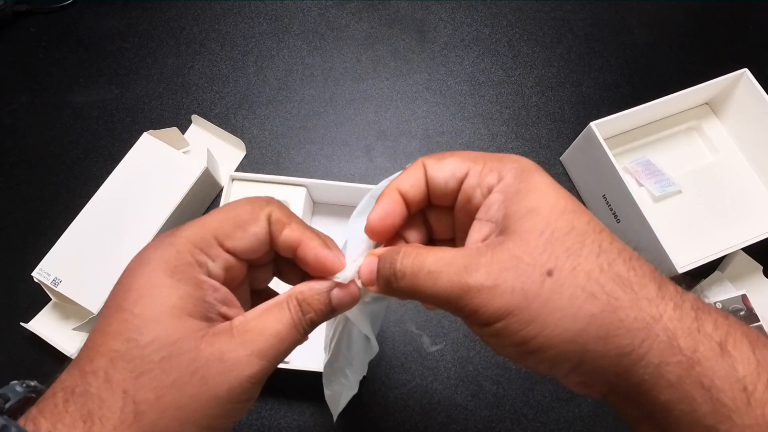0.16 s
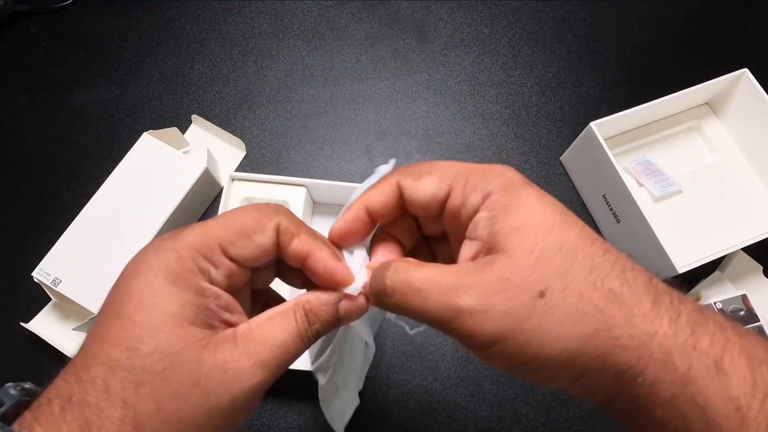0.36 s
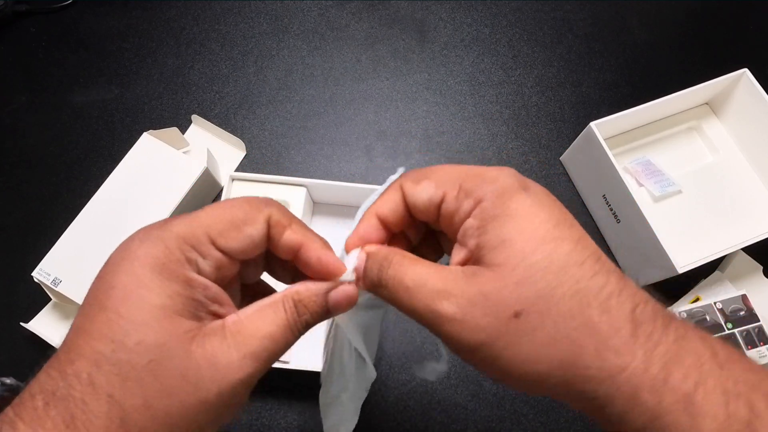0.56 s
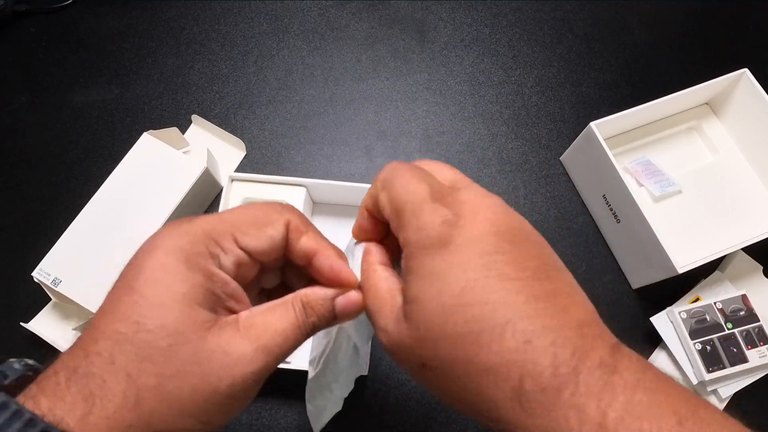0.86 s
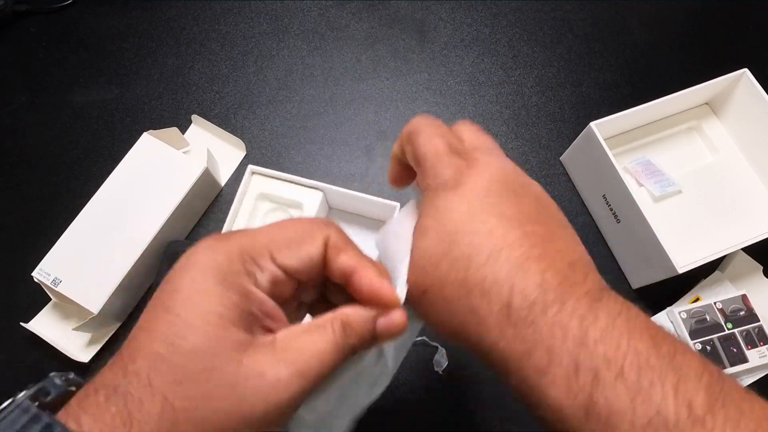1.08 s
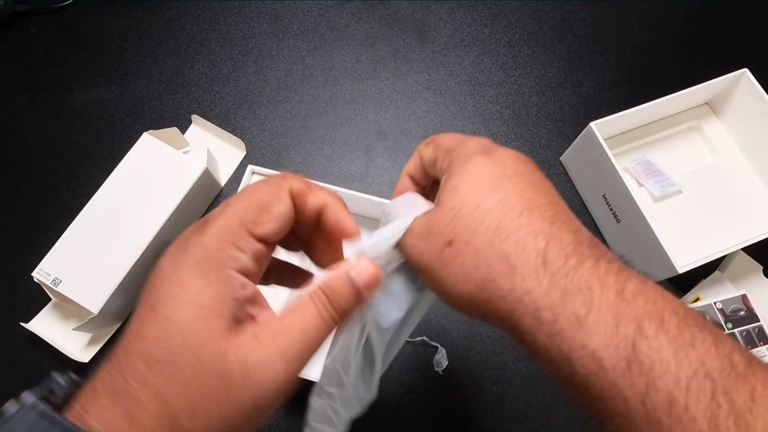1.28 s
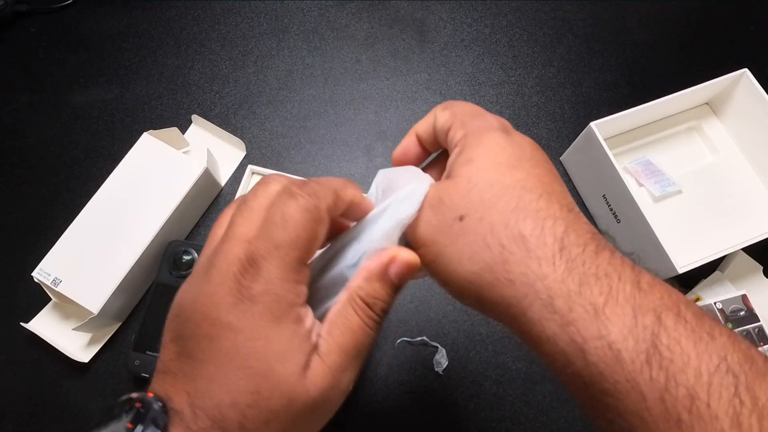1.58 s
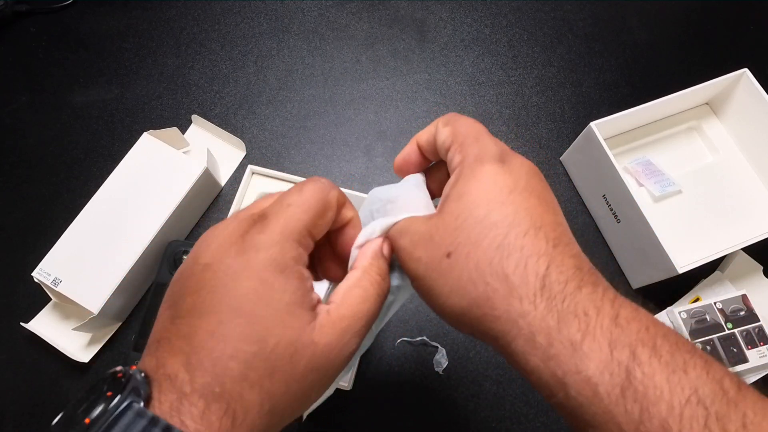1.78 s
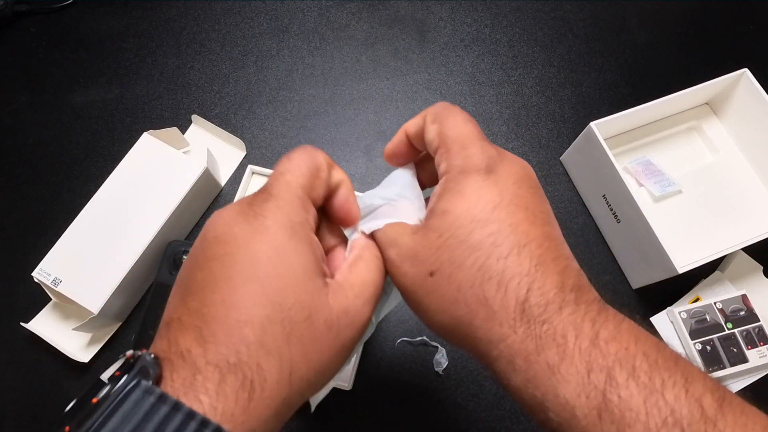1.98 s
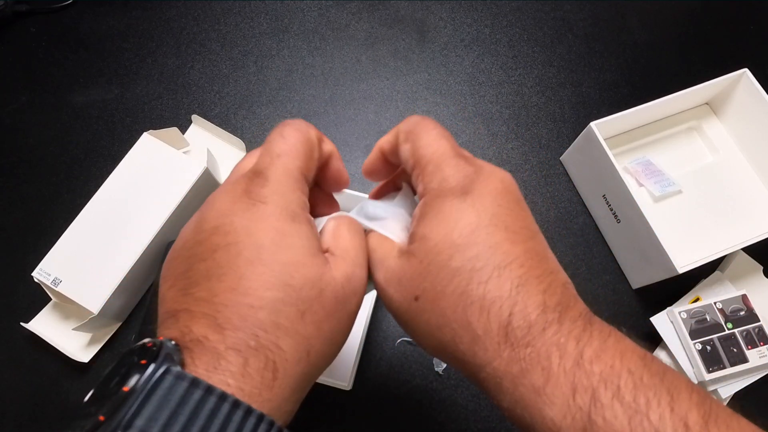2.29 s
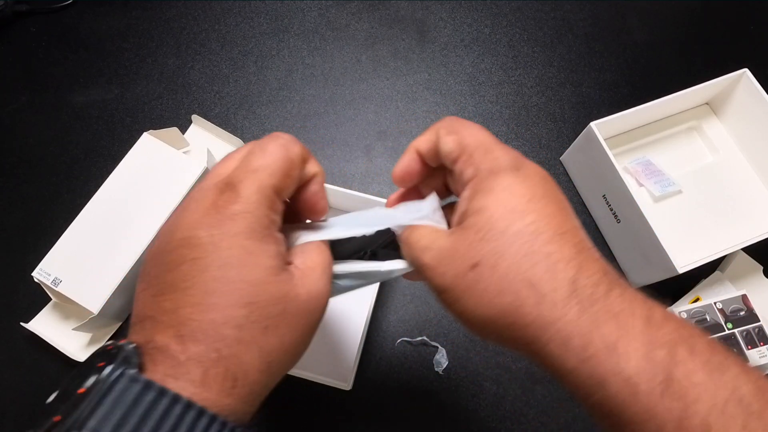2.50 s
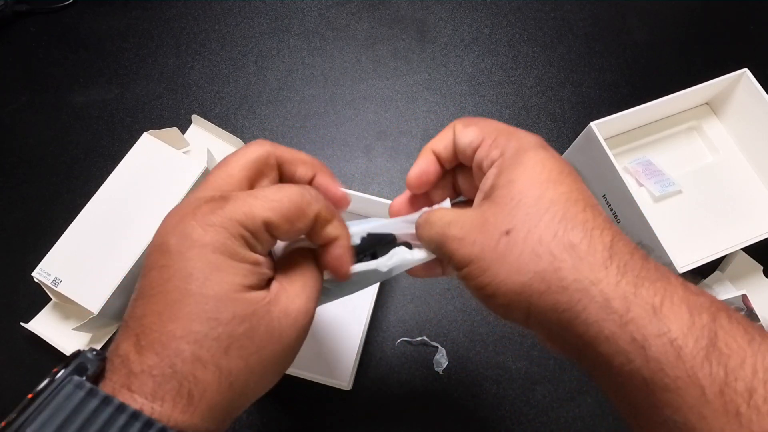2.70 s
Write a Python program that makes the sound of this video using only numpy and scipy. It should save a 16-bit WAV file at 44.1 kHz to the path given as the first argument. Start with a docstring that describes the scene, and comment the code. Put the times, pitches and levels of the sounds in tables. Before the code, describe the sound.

Plastic film rustling and snapping in the fingers, with short rips and soft pops, indoors

```python
"""A thin plastic bag over a desk in a small quiet room, held slightly right of a pair of microphones.
Ventilation rumble, a low drone and a wavering hum lie below throughout. From the start, film slides on
film in a rustle of tiny buckles and creases snap; then a fingertip slips on stretched film and plucks it,
and wider folds ring dully. Later, short rips run as trains of tiny breaks, the sheet pops and thumps
the air in the bag as it goes taut, and friction squeaks once; rustle, snaps and rips go on after that."""
import sys
import numpy as np
from scipy import signal
from scipy.fft import rfft, irfft, next_fast_len
from scipy.io import wavfile

SR = 44100
rng = np.random.default_rng(int(sys.argv[2]) if len(sys.argv) > 2 else 0)


def waveform_to_disk(signal):
    """Save audio, clipped to [-1, 1], as 16-bit WAV at the path in sys.argv[1]."""
    frames = np.transpose(np.atleast_2d(signal))
    scaled = np.clip(frames, -1, 1) * 32767
    samples = np.round(scaled).astype(np.int16)
    wavfile.write(sys.argv[1], SR, samples)


N = 125685
TIME = np.arange(N) / SR  # seconds

# ventilation colour: (frequency [Hz], relative density [dB per Hz])
AIR_SPECTRUM = [(18, -5.5), (29, -5), (40, 1), (52, -22.5), (70, -11.5), (90, -23.5), (115, -16),
                (170, -23), (370, -19.5), (650, -37), (2000, -42), (16000, -51)]
AIR_DB, AIR_SIDE_DB = -54, -7  # rms level; left-right difference noise relative to the common noise
HUM_HZ, HUM_DB = 118.5, -69.5  # median rms level
DRONE_HZ, DRONE_DB = 29.3, -55  # median rms level

# rustle before the layer trims: (time [s], treble level [dB], middle level [dB])
RUSTLE = [(0, -51, -51), (0.11, -50, -51), (0.186, -51.5, -55), (0.21, -61, -54.5), (0.266, -61, -57.5),
          (0.307, -42, -49), (0.339, -64, -51), (0.385, -61, -55), (0.439, -44, -46.5), (0.468, -50, -54.5),
          (0.538, -52.5, -52), (0.56, -41.5, -46), (0.596, -40.5, -42), (0.615, -62, -52.5),
          (0.692, -59.5, -50), (0.735, -39, -56.5), (0.759, -40, -49.5), (0.81, -52.5, -54),
          (0.884, -63, -60), (0.936, -48.5, -51), (0.977, -34.5, -36), (1.004, -42, -48), (1.1, -41.0, -46),
          (1.126, -47, -51), (1.182, -40.5, -43.5), (1.195, -28.5, -30), (1.238, -32, -36.5),
          (1.266, -38.5, -40), (1.341, -51.5, -47.5), (1.381, -58.5, -46), (1.419, -39, -41),
          (1.48, -36.5, -38.5), (1.521, -42.5, -50.5), (1.572, -52.5, -48), (1.631, -47.5, -50.5),
          (1.695, -40, -40), (1.75, -42, -48.5), (1.846, -45.5, -47), (1.884, -38.5, -40),
          (1.934, -53, -46.5), (1.97, -44, -49), (2.03, -40, -46), (2.06, -49, -47.5), (2.113, -41.5, -46),
          (2.151, -49.5, -51.5), (2.194, -41.5, -39), (2.219, -51.5, -52.5), (2.254, -51.5, -51),
          (2.3, -43.5, -45.5), (2.41, -44, -44), (2.445, -45.5, -44.5), (2.499, -44, -42.5),
          (2.542, -41, -41.5), (2.559, -33, -35), (2.591, -34, -34), (2.615, -39, -38.5), (2.671, -36, -39),
          (2.735, -37.5, -35.5), (2.757, -47.5, -47.5), (2.85, -43.5, -49)]
# low body of the sheet relative to its middle, before the trims: (time [s], level [dB])
FULLNESS = [(0,-10.5),(.3,-2.5),(.55,2),(.75,-3.5),(1.15,-6),(1.2,4),(1.35,1),(1.55,-4),(1.9,2),(2.0,-2.2),(2.3,-1),(2.85,2)]
# colour of the bright sliding: (frequency [Hz], relative density [dB per Hz])
TREBLE_SPECTRUM = [(900, -69), (1800, -4.5), (2500, -3.5), (3600, -2), (5500, 0.5), (7500, 0.5),
                   (10000, -3.5), (12500, -3.5), (14000, -10.5), (16000, -17)]
# colour of the duller flexing: (frequency [Hz], relative density [dB per Hz])
MIDDLE_SPECTRUM = [(500,-37),(800,-9),(1100,1),(1600,2),(2200,3.5),(3200,1),(6000,-15.5)]
# colour of the low body of the sheet: (frequency [Hz], relative density [dB per Hz])
BODY_SPECTRUM = [(90,-5.5),(170,-11),(270,-6.5),(380,4),(560,1),(760,-5),(1100,-2.5),(2000,-15)]
TREBLE_TRIM_DB, MIDDLE_TRIM_DB, BODY_TRIM_DB = -1, -4, -10.5
TREBLE_GRAIN, MIDDLE_GRAIN = 0.47, 0.74  # share of power in separate buckles
BUCKLE_SPREAD_DB = 3
# the buckle rate holds at this treble level and climbs with it (dB of rate per dB of treble)
BUCKLES_PER_S, BUCKLES_AT_DB, BUCKLES_FOLLOW = 2200, -44.5, 1.3

FINE, SMALL, BROAD, WIDE = 8400, 6360, 4770, 3460  # crease sizes, by the centre of their click (Hz)
# single creases snapping, before the trim: (time [s], energy [dB], click centre [Hz])
SNAPS = [(.023,-11,SMALL),(.057,-20,SMALL),(0.064,-17.5,BROAD),(0.0855,-22,BROAD),(0.097,-17,SMALL),(0.118,-20,SMALL),(.1617,-24,FINE),(0.1655,-28,SMALL),(.18,-26,BROAD),
         (.2164,-19,FINE),(0.227,-27,FINE),(0.2334,-24.5,SMALL),(.2705,-29,SMALL),(0.3034,-10.5,SMALL),(.3188,-16.5,SMALL),(0.327,-15,FINE),(0.349,-11.5,FINE),(.366,-25,SMALL),
         (0.393,-23,SMALL),(.4052,-18.5,FINE),(.427,-20,SMALL),(0.4467,-17,SMALL),(0.481,-17,SMALL),(0.5423,-17.5,FINE),
         (0.645,-18,FINE),(0.647,-19.5,WIDE),(.667,-21,BROAD),(.682,-18,WIDE),(0.694,-16.5,FINE),(.712,-10,BROAD),(0.7516,-5.5,SMALL),(0.775,-23,BROAD),
         (0.816,-23,SMALL),(.83,-18,SMALL),(0.8412,-20,FINE),(0.8534,-4,BROAD),(.904,-18,BROAD),(.915,-12.5,BROAD),(1.0683,-11.5,BROAD),(1.145,-16,FINE),
         (1.327,-20,BROAD),(1.3571,-12,BROAD),(1.394,-24,BROAD),(1.404,-16,SMALL),(1.421,-5,BROAD),(1.4679,-12,BROAD),(1.482,-11,SMALL),(1.5693,-22,SMALL),(1.593,-13,SMALL),(1.6125,-14,SMALL),
         (1.834,-12.5,SMALL),(1.8784,-13.5,BROAD),(1.9165,-16,BROAD),(1.948,-13.5,SMALL),(1.9865,-18,SMALL),(2.0745,-15.5,SMALL),(2.0822,-25,BROAD),
         (2.162,-24,BROAD),(2.201,-16,WIDE),(2.263,-14,SMALL),(2.268,-13.5,BROAD),(2.305,-12,FINE),(2.346,-11,BROAD),(2.42,-7,WIDE),(2.433,-11.5,WIDE),(2.452,-16,BROAD),
         (2.556,-15,BROAD),(2.587,-19,BROAD),(2.594,-7,WIDE),(2.6275,-22,BROAD),(2.6416,-7.5,FINE),(2.6668,-5.5,BROAD)]
SNAP_TRIM_DB, SNAP_WIDTH = -3.5, 0.4  # width as a share of the centre frequency
SHIVER_DB, SHIVER_T60_S = 6.5, 0.025  # relative to the click, at the treble level BUCKLES_AT_DB
SHIVER_FOLLOWS = 0.4  # dB more shiver per dB of rustle: busy film snaps in clusters

# fingertip slips, before softening: (time [s], level [dB], slack low mode relative to it [dB])
SLIPS = [(.4595,-43,-11),(.469,-38,-12),(0.4782,-45,0),(.4802,-40.5,-6),(0.485,-42,-1),(0.488,-45,-8),(.4915,-41,1.5),(.494,-33.5,-14),(2.2817,-33,-12)]
# notes of the stretched film: (frequency [Hz], relative level [dB], t60 [s])
SLIP_MODES = [(1080, 0, .013), (1370, 1, .014)]
SLIP_LOW_HZ, SLIP_LOW_T60_S, SLIP_SOFT_HZ = 537, 0.014, 1900

# wider folds buckling: (time [s], level [dB], centre [Hz])
FOLDS = [(0.913,-39,2290),(.978,-34,2010),(1.099,-38,1850),(1.192,-26.5,1950),(2.201,-36,2240),(2.338,-36,1260),(2.3447,-33.5,2190),(2.627,-37,1940),(2.666,-32,2090)]
FOLD_ATTACK_S, FOLD_T60_S, FOLD_WIDTH_HZ = 0.00029, 0.042, 320
FOLD_TONE_DB = -10  # peak of the clean ring relative to the rms of the noisy one

# short rips, before spreading and layering: (time [s], length [s], level [dB], centre [Hz])
RIPS = [(1.191,.016,-29,5040),(2.526,.009,-31.5,4970),(2.57,.026,-33.5,3560),(2.677,.009,-39,3300),(2.716,.022,-38,2840)]
RIP_BREAKS_PER_S, RIP_BREAK_T60_S = 420, 0.0027
RIP_JITTER, RIP_WIDTH = .3, 0.87  # shares of the mean gap and of the centre frequency

# slack film flapping taut, before filtering: (time [s], level [dB], thump relative to it [dB])
FLAPS = [(1.192,-30,-3.5),(1.4705,-37.5,-9),(2.262,-41,-10),(2.4195,-29,-4),(2.667,-35.5,-6),(2.679,-33,-5)]
FLAP_T60_S, FLAP_LOW_HZ, FLAP_HIGH_HZ, FLAP_POP_DB = 0.022, 190, 2000, 18.5
THUMP_HZ, THUMP_T60_S = 310, .02  # the pocket of air in the bag

SQUEAK_S, SQUEAK_WIDTH_S, SQUEAK_HZ, SQUEAK_BAND_HZ, SQUEAK_DB = 1.403, .011, 6700, 750, -36

# desk and boxes, paths about 0.9, 1 and 3.2 m longer than the direct one: (delay [s], level [dB])
REFLECTIONS = [(.0025, -38), (.003, -28), (.0093, -49)]
ROOM_T60_S, ROOM_DB = 0.14, -18.5
# likeness of the two microphones: (frequency [Hz], left-right correlation [0 to 1])
LIKENESS = [(100, 0.77), (400, 1), (1000, 0.92), (2000, 0.84), (4000, 0.73), (8000, 0.095), (15000, 0.73)]
# left microphone relative to the right: (frequency [Hz], level [dB])
BALANCE = [(200, -0.5), (1000, -0.8), (2500, -2), (5000, -4), (9000, -3.5), (13000, -6.5)]
LEFT_LAG_S = .000028
CUTOFF_HZ = 16100


def from_db(db):
    """Decibels to gain."""
    return 10 ** (np.asarray(db) / 20)


def rms_one(x):
    """Scale to unit rms."""
    return x / np.sqrt(np.mean(x ** 2) + 1e-20)


def at_hz(points, hz):
    """Read a table on a log-frequency axis."""
    f, v = np.transpose(points)
    return np.interp(np.log(hz + 1), np.log(f), v)


def shaped(x, gain):
    """Filter by a smooth gain, given as a function of frequency."""
    size = next_fast_len(N + 8192)  # spare length keeps the end from wrapping to the start
    return irfft(rfft(x, size) * gain(np.fft.rfftfreq(size, 1 / SR)), size)[..., :N]


def drift(rate_hz):
    """Slow random wandering of unit rms: noise that falls away above the given rate."""
    return rms_one(shaped(rng.standard_normal(N), lambda f: 1 / (1 + (f / rate_hz) ** 2)))


def resonance(x, hz, width_hz):
    """Two-pole band-pass: a damped mode driven by x."""
    r = np.exp(-np.pi * width_hz / SR)
    return signal.lfilter([1, 0, -1], [1, -2 * r * np.cos(2 * np.pi * hz / SR), r * r], x + 1e-18)


def add(out, s, sound):
    """Mix a sound in at a time in seconds."""
    i = max(0, int(s * SR))
    out[..., i:i + sound.shape[-1]] += sound[..., :N - i]


def spread(pair):
    """Two unrelated signals become left and right, as alike as LIKENESS says at each frequency."""
    alike = lambda f: np.clip(at_hz(LIKENESS, f), 0, 1)
    common = shaped(pair[0], lambda f: np.sqrt(1 + alike(f)))
    difference = shaped(pair[1], lambda f: np.sqrt(1 - alike(f)))
    return common + difference * [[1], [-1]]


def background():
    """Ventilation rumble as coloured noise, with a hum and a low drone that waver in level and phase."""
    common = rng.standard_normal(N)
    side = from_db(AIR_SIDE_DB) * rng.standard_normal(N) * np.array([[1], [-1]])
    air = rms_one(shaped(common + side, lambda f: from_db(at_hz(AIR_SPECTRUM, f))))
    hum = from_db(HUM_DB + 3 * drift(6)) * np.sin(2 * np.pi * HUM_HZ * TIME + .7 * drift(9))
    drone = from_db(DRONE_DB + 0.6 * drift(5.5)) * np.sin(2 * np.pi * DRONE_HZ * TIME + drift(6.0))
    return from_db(AIR_DB) * air + np.sqrt(2) * (hum + drone)  # root two: sine peak to rms


def film(spectrum, grain, rate, patchy_db):
    """Tiny buckles of random size over sliding friction, each band patchy on its own; rms 1."""
    born = rng.random(N) < rate / SR
    size_db = BUCKLE_SPREAD_DB * np.minimum(rng.exponential(1, N), 4)
    sizes = born * from_db(size_db) / np.sqrt(rate)
    grain, out = np.clip(grain, 0, 1), 0
    edges = np.geomspace(80, 17000, 13)
    for band in zip(edges, edges[1:]):
        buckles = rms_one(sizes * rng.standard_normal((2, N)))
        friction = rng.standard_normal((2, N))
        drive = np.sqrt(grain) * buckles + np.sqrt(1 - grain) * friction
        band_pass = signal.butter(2, band, "band", fs=SR, output="sos")
        out = out + signal.sosfilt(band_pass, drive) * from_db(patchy_db * drift(23))
    return rms_one(shaped(spread(out), lambda f: from_db(at_hz(spectrum, f))))


def rustle(clump_db=1.5):
    """Bright sliding, duller flexing and a low body: sparse ticks when gentle, a dense rush when pulled hard."""
    s, *levels = np.transpose(RUSTLE)
    treble, middle = [np.interp(TIME, s, level) for level in levels]
    body = middle + np.interp(TIME, *np.transpose(FULLNESS))
    rate = BUCKLES_PER_S * from_db(BUCKLES_FOLLOW * (treble - BUCKLES_AT_DB))
    rate = np.minimum(rate, SR / 2)
    bright = from_db(treble + TREBLE_TRIM_DB) * film(TREBLE_SPECTRUM, TREBLE_GRAIN, rate, patchy_db=2.38)
    dull = from_db(middle + MIDDLE_TRIM_DB) * film(MIDDLE_SPECTRUM, MIDDLE_GRAIN, rate, patchy_db=2.9)
    low = from_db(body + BODY_TRIM_DB) * film(BODY_SPECTRUM, MIDDLE_GRAIN, rate, patchy_db=2.5)
    return from_db(clump_db * drift(50)) * (bright + dull + low)


def snaps():
    """A crease flips with a click of two or three cycles, and the film around it shivers."""
    out, t = np.zeros((2, N)), TIME[:SR // 30]
    times, treble, _ = np.transpose(RUSTLE)
    for s, db, hz in SNAPS:
        width_hz = SNAP_WIDTH * hz
        click = resonance(resonance(1.0 * (t == 0), hz, width_hz), hz, width_hz)
        fading = rng.standard_normal((2, len(t))) * from_db(-60 * t / SHIVER_T60_S)
        shiver = resonance(fading, hz, 0.84 * hz)
        busy_db = np.interp(s, times, treble) - BUCKLES_AT_DB
        share = from_db(SHIVER_DB + SHIVER_FOLLOWS * busy_db)
        snap = rms_one(rms_one(click) + share * rms_one(shiver)) / np.sqrt(len(t))  # unit energy
        add(out, s, from_db(db + SNAP_TRIM_DB) * snap)
    return out


def slips():
    """Each slip of a soft fingertip plucks the stretched film; slack film adds a lower note."""
    out, t = np.zeros(N), TIME[:SR // 30]
    mode = lambda hz, db, t60: from_db(db - 60 * t / t60) * np.sin(2 * np.pi * hz * t)
    pluck = sum(mode(*row) for row in SLIP_MODES)
    for s, db, low_db in SLIPS:
        add(out, s, from_db(db) * (pluck + mode(SLIP_LOW_HZ, low_db, SLIP_LOW_T60_S)))
    soften = signal.butter(2, [400, SLIP_SOFT_HZ], "band", fs=SR, output="sos")
    return signal.sosfilt(soften, out + 1e-18)


def folds():
    """Larger patches of film flip over with a dull tick: a narrow noisy ring beside a clean one."""
    out, t = np.zeros(N), TIME[:SR // 15]
    shape = (1 - np.exp(-t / FOLD_ATTACK_S)) * from_db(-60 * t / FOLD_T60_S)
    for s, db, hz in FOLDS:
        flutter = rms_one(resonance(rng.standard_normal(len(t)), hz, FOLD_WIDTH_HZ))
        tone = from_db(FOLD_TONE_DB) * np.sin(2 * np.pi * hz * t)
        add(out, s, from_db(db) * shape * rms_one(flutter + tone))
    return out


def rips(uneven_db=1.5):
    """A tear runs as a quick, uneven train of tiny breaks and stops dead."""
    out, t = np.zeros((2, N)), TIME[:SR // 100]
    for s, length, db, hz in RIPS:
        for k, (late, strength) in enumerate(rng.standard_normal((20, 2))):
            crack = resonance(rng.standard_normal((2, len(t))), hz, RIP_WIDTH * hz)
            if k < length * RIP_BREAKS_PER_S:
                fade = from_db(db + uneven_db * strength - 60 * t / RIP_BREAK_T60_S)
                start = s + (k + RIP_JITTER * late) / RIP_BREAKS_PER_S
                add(out, start, fade * rms_one(crack))
    return spread(out) * np.sqrt(2)


def flaps():
    """The whole sheet pops, thumps the air in the bag and flutters out."""
    out, thumps, t = np.zeros(N), np.zeros(N), TIME[:SR // 15]
    for s, db, thump_db in FLAPS:
        pop = from_db(FLAP_POP_DB) * (t == 0)
        flutter = rng.standard_normal(len(t)) * from_db(-60 * t / FLAP_T60_S)
        add(out, s, from_db(db) * (pop + flutter))
        thump_fade = from_db(db + thump_db - 60 * t / THUMP_T60_S)
        add(thumps, s, thump_fade * np.sin(2 * np.pi * THUMP_HZ * t))
    band = signal.butter(1, [FLAP_LOW_HZ, FLAP_HIGH_HZ], "band", fs=SR, output="sos")
    # the gain makes up for the power that the band-pass removes
    return signal.sosfilt(band, out + 1e-18) * np.sqrt(SR / (np.pi * FLAP_HIGH_HZ)) + thumps


def squeak():
    """Friction briefly sings in a narrow band."""
    swell = np.exp(-.5 * ((TIME - SQUEAK_S) / SQUEAK_WIDTH_S) ** 2)
    singing = rms_one(resonance(rng.standard_normal((2, N)), SQUEAK_HZ, SQUEAK_BAND_HZ))
    return from_db(SQUEAK_DB) * swell * singing


def room(x):
    """Direct sound, near reflections and a short diffuse tail of decaying noise."""
    t = TIME[:SR // 3]
    tail = rng.standard_normal((2, len(t))) * from_db(-60 * t / ROOM_T60_S) * (t > .004)
    tail = signal.lfilter([1], [1, -.45], tail)  # duller treble
    tail = rms_one(tail) / np.sqrt(len(t))
    near = sum(from_db(db) * np.pad(x, ((0, 0), (int(s * SR), 0)))[:, :N] for s, db in REFLECTIONS)
    return x + near + from_db(ROOM_DB) * signal.fftconvolve(x, tail, axes=1)[:, :N]


def scene():
    """The bag is right of centre: the left microphone hears it softer and slightly later."""
    # each rip is two layers of breaks, drawn separately
    bag = rustle() + snaps() + rips() + rips() + folds() + slips() + flaps() + squeak()
    left, right = room(bag)
    lag = lambda f: np.exp(-2j * np.pi * f * LEFT_LAG_S)
    left = shaped(left, lambda f: from_db(at_hz(BALANCE, f) / 2) * lag(f))
    right = shaped(right, lambda f: from_db(-at_hz(BALANCE, f) / 2))
    return np.array([left, right]) + background()


def record(dry):
    """A steep elliptic low-pass cuts the top."""
    return signal.sosfilt(signal.ellip(10, .1, 80, CUTOFF_HZ, fs=SR, output="sos"), dry)


dry = scene()
out = record(dry)
waveform_to_disk(out)
```